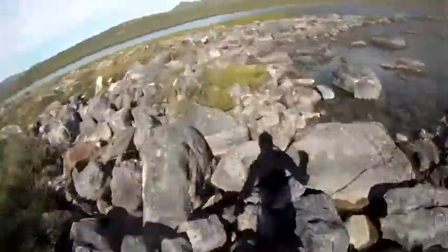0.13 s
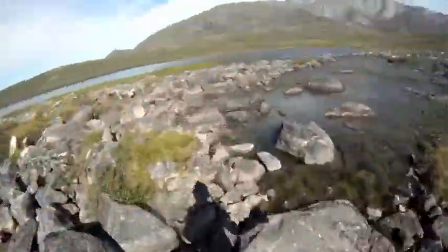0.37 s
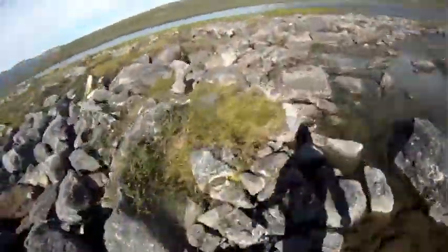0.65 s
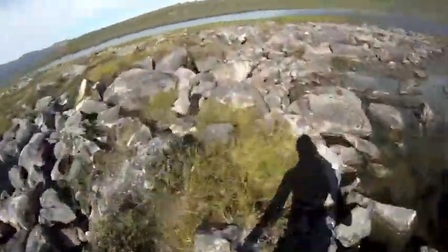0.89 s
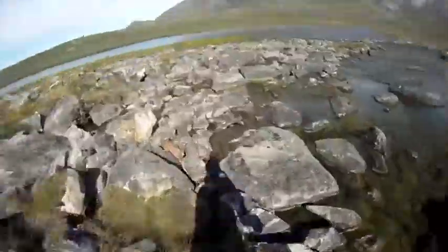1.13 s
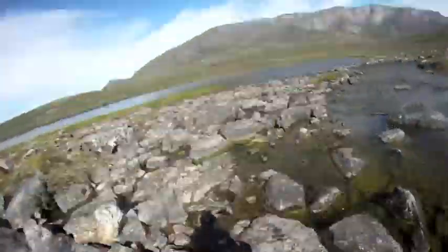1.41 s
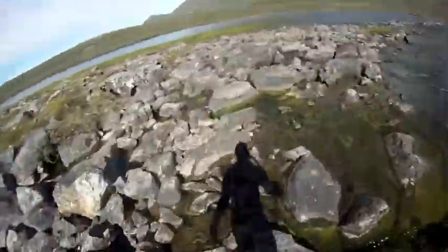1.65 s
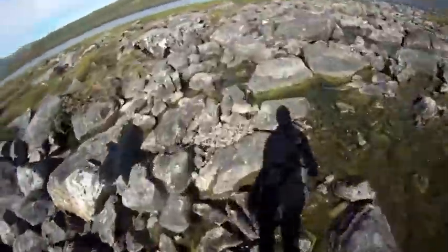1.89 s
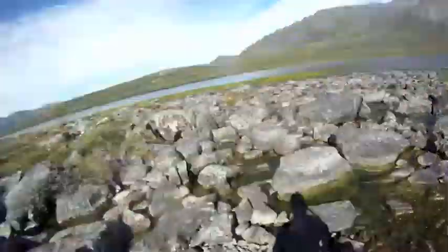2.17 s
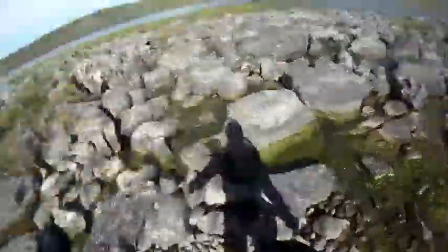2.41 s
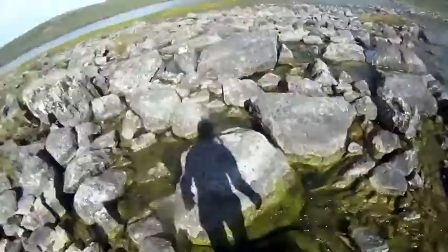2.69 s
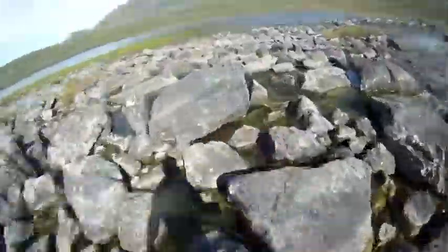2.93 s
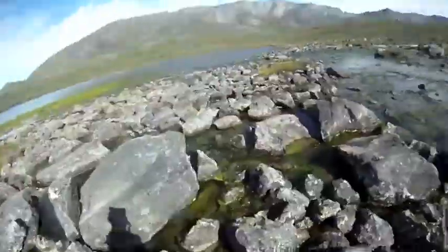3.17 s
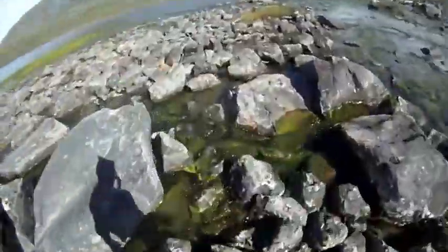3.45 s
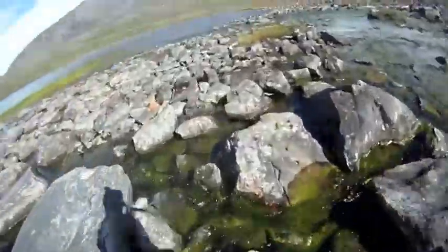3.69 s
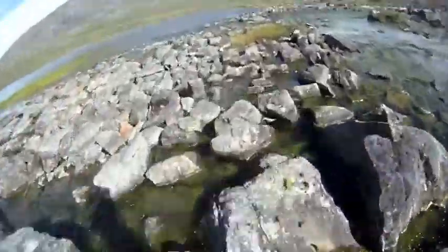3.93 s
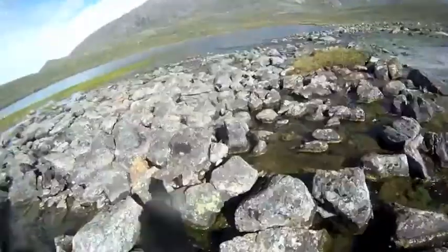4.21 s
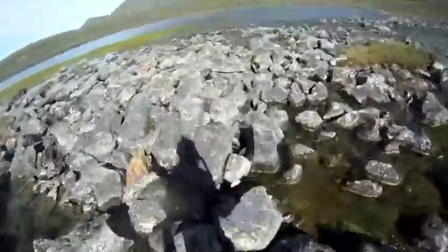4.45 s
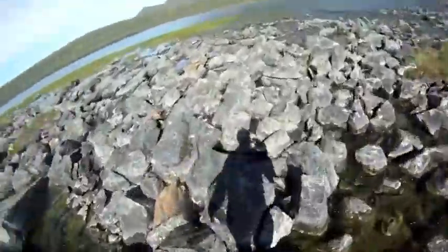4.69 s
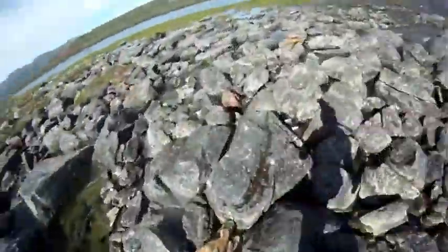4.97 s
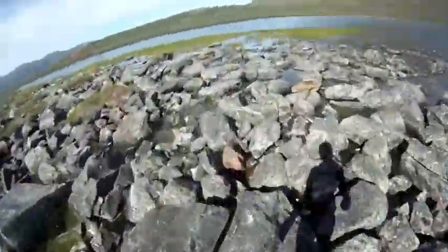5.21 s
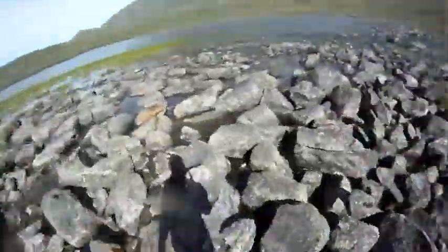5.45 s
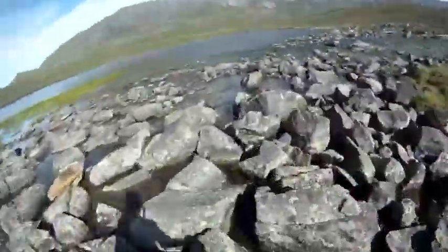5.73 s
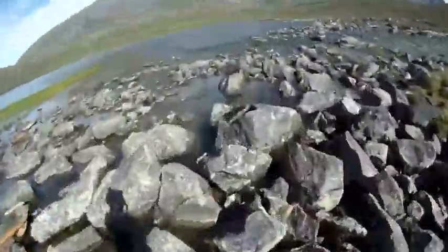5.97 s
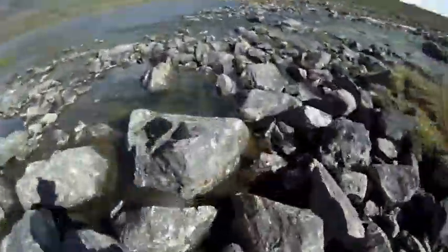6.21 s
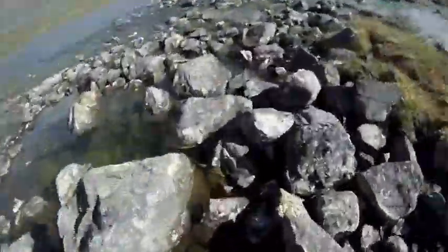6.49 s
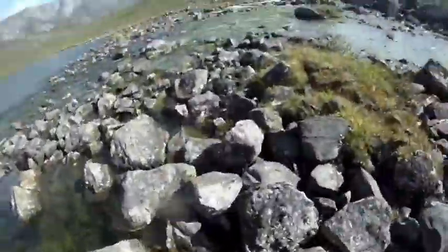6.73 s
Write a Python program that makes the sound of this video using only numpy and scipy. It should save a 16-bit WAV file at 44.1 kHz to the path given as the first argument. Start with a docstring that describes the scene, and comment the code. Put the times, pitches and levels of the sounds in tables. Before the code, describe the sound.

For nearly seven seconds a walker clambers over rocks, heard from inside a plastic camera housing fixed to the body. Everything is close, dry and muffled. A firm double thump opens at 0.1 s with small plastic ticks, then knocks follow at 0.4, 0.6, 1.0, 1.15, 1.3 and 1.4 s, with a strong, hard-edged one at 1.55 s. A cluster of lighter rattles and clicks comes around 2.2 s, then solid thuds at 2.5 and 2.8 s. A very short, bright click snaps at 3.06 s, followed by a thump at 3.25 s. Weaker bumps lead to a pair at 4.15 and 4.3 s and another at 4.6 s. Quieter shuffling follows until heavy knocks at 5.66 and 6.17 s; the end is calmer. Low shaking, slight creaks, faint cloth scuffs, tiny crackles and thin airy hiss continue underneath, the air rising slightly.

```python
"""Jolts make a mount ring briefly, mostly near 160 Hz, as a walker clambers over boulders with a
camera in a plastic housing; each is a swelling, dying sine, a second mode and a sharp edge.
Coloured noise shakes and creaks the mount between jolts. Ticks, scuffs and settling seams are short
noise bursts exciting the housing's modes; faint open air is noise through the port's resonances."""
import sys
import numpy as np
from scipy import signal
from scipy.fft import rfft, irfft, next_fast_len
from scipy.io import wavfile
from scipy.ndimage import map_coordinates

SR = 44100
rng = np.random.default_rng(int(sys.argv[2]) if len(sys.argv) > 2 else 0)


def int16_out(signal):
    """Quantize to a 16-bit WAV file."""
    q = np.round(np.clip(np.atleast_2d(signal).T, -1, 1) * 32767)
    wavfile.write(sys.argv[1], SR, q.astype(np.int16))


def linear_from_db(decibels):
    """Turn decibels (scalar or array-like) into linear amplitude factors; 0 gives 1."""
    return 10 ** (np.asarray(decibels, float) / 20)


N = 302557

# Jolts to the mount. Each row: start in seconds, ring level in dB, ring frequency in Hz,
# 60 dB decay time of the ring in ms, drive of the sharp edge in dB relative to the ring.
JOLT_ROWS = [(0.1146, -22, 138, 21, -8), (0.1222, -11, 142.5, 40, -7), (0.1753, -43, 156, 83, -13),
             (0.295, -35.5, 149, 75, -1), (0.431, -20, 161, 23, -23), (0.4426, -32.5, 198, 44, -21),
             (0.5672, -34, 155, 30, -10), (0.5787, -12, 143.5, 38, 5), (0.612, -37, 107, 80, 7),
             (0.693, -26.5, 164.6, 79, -7), (0.8304, -44.5, 132, 390, -1), (0.9847, -14.5, 171.2, 34, -6.5),
             (1.1592, -13, 141.4, 28, -23), (1.3103, -20, 153.6, 25.4, -12), (1.4163, -14, 156.6, 46, -16),
             (1.564, -9.5, 150, 24.3, 1.5), (1.7142, -32, 180, 50, -9), (1.7297, -25, 157, 32, -24),
             (1.808, -39, 173, 84, -19), (1.8344, -24.5, 156, 28, -12), (1.974, -44, 188, 60, 14.5),
             (2.1822, -29.5, 149, 50, -6), (2.1981, -41, 169, 30, 8), (2.2076, -25.5, 174, 17, 16.5),
             (2.2212, -25, 117, 83, -11), (2.238, -40, 150, 55, 15), (2.276, -33, 108, 60, -4),
             (2.3326, -54, 169, 52, -12), (2.4722, -11.5, 167.8, 28, 6), (2.7973, -15.5, 134.6, 28, -21),
             (2.8, -32, 283, 18, -14), (2.9476, -37, 163, 45, 2), (2.964, -31.5, 144.5, 19, -11),
             (2.986, -39, 154, 83, -5), (3.0926, -24, 204, 86, -6), (3.2556, -15, 162.7, 45, -21),
             (3.3958, -29, 150, 30, -30), (3.43, -40, 157, 70, -14), (3.5348, -40, 200, 21, 0),
             (3.546, -38.5, 172, 39, 1), (3.6832, -27.5, 159, 27, -28), (3.734, -37.5, 149, 26, -12),
             (3.844, -28.5, 151.5, 28, -8), (4.0082, -22.5, 156, 25, -25), (4.0228, -34.5, 134, 83, -5),
             (4.0391, -32.5, 150, 23, -7), (4.0569, -39, 172, 140, -4), (4.147, -13, 153.3, 33, -27),
             (4.274, -13, 175, 37, -30), (4.4492, -28, 180, 22, -27), (4.497, -44.5, 141, 50, -9),
             (4.5648, -30.5, 159, 48, -1), (4.5942, -16.5, 167, 70, -9), (4.672, -50.5, 253, 37, 20),
             (4.8039, -34, 173, 78, -9), (4.9752, -23.5, 155.5, 35, -18), (5.1713, -50, 234, 140, 6),
             (5.186, -37.5, 158.4, 130, 7.5), (5.3096, -41.5, 197, 115, -7), (5.3542, -28, 163, 46, -6),
             (5.5014, -34, 156, 99, -12), (5.652, -48, 168, 27, 8), (5.6609, -10, 160.3, 27, -1.5),
             (5.799, -37.5, 202, 28, -6), (5.9807, -38, 135, 23, -3), (6.0043, -23.5, 152, 18.6, -6),
             (6.163, -30, 164, 34, -5), (6.171, -12.5, 155.4, 26.5, -18), (6.4028, -42.5, 130, 41, 7),
             (6.538, -43, 174, 150, -18), (6.7063, -39.5, 170, 69, -15)]
# Ticks of the housing. Each row: start in seconds, drive of the middle modes in dB, of the low modes
# in dB relative to the middle, of the top modes in dB relative to the middle, 1/e decay time in ms.
TICK_ROWS = [(0.1154, -54.5, 11, -14, 1.3), (0.1269, -31, -16.5, -28, 1.2),
             (0.1308, -35.5, -0.5, -27, 0.69), (0.582, -40.5, -0.5, 6, 2.7), (0.5881, -36, 2, -21, 0.69),
             (0.5945, -52, 10, -18, 0.83), (0.621, -41.5, -2, -22, 0.75), (0.699, -44, -4, -19, 1.5),
             (0.866, -46, -17, -1, 0.6), (0.9914, -54, 8, -12, 2.1), (0.993, -49.5, 2, -15, 0.57),
             (1.1676, -39, -4, -26, 0.54), (1.1831, -46, -4, -11, 0.7), (1.313, -48, -0.5, -5, 1.5),
             (1.5693, -37.5, 1.5, -5, 1.17), (1.5734, -35, 0, -20, 0.49), (2.186, -42, -6, -4, 1.3),
             (2.1995, -35.5, 5, -17, 0.78), (2.2029, -42, -6, -10, 2.4), (2.225, -49.5, 0, -18, 1.24),
             (2.2383, -36.5, -9, 2, 0.69), (2.2508, -45, 8, -19, 0.8), (2.2678, -49, 4.5, -11, 1.7),
             (2.4766, -44, 5, -1, 2.3), (2.4855, -49, -17, -6, 1.3), (2.5113, -42, -1, -22, 0.67),
             (2.7998, -59, 11, -12, 2.9), (2.8079, -31.5, -7, -24, 0.43), (3.0622, -6.5, -40, 2, 0.11),
             (3.68, -59, -5, -5, 1.2), (3.9176, -36.5, -11, -11, 0.53), (4.1432, -41, -2, -18, 1.1),
             (4.15, -37.5, 11, -15, 0.4), (4.156, -36.5, -8, -24, 0.53), (4.3205, -30, -16, -13, 0.36),
             (4.448, -52, 10.5, -14, 0.66), (5.657, -54, 6, -15, 0.7), (5.6652, -41.5, 11.5, -6, 0.65),
             (5.6689, -35, 1.5, -11, 0.49), (5.6771, -39, 5.5, -16, 0.77), (5.696, -48, -5, -25, 0.65),
             (5.978, -52, -2, -22, 1.1), (6.1796, -36, -1.5, -27, 0.34), (6.348, -42, -3, -14, 0.55),
             (6.6578, -48, -1, -1, 1.2)]
# Cloth and strap scuffs. Each row: centre in seconds, drive in dB, drive of the low modes in dB
# relative to it, width at half amplitude in ms (before the grit).
SCUFF_ROWS = [(0.102, -62.5, 1.5, 25.5), (0.147, -64.5, -1, 24), (0.227, -72, -1, 26), (0.306, -70, 4, 14),
              (0.365, -71, 4, 14), (0.604, -70, 4, 69), (0.617, -61.5, -2, 18), (0.671, -70.5, 5.5, 21),
              (0.883, -74, -8, 35), (0.921, -68.5, 1, 14), (0.99, -77, 4, 47), (1.178, -68.5, 5.5, 43),
              (1.575, -64, -9, 20), (1.74, -68, 7, 20), (1.779, -69, 3, 24), (1.825, -70.5, 4, 31),
              (1.871, -70, 4.5, 19), (2.211, -63, -2, 12), (2.236, -63.5, 0.5, 64), (2.271, -56.5, 11.5, 6),
              (2.321, -70.5, 2.5, 36), (2.49, -64, -1, 43), (2.606, -73, -4, 29), (2.698, -68.5, -5, 28),
              (2.812, -71, -10, 21), (2.99, -63, 3.5, 14.6), (3.019, -73, 5, 19), (3.207, -68.5, 5, 15.5),
              (4.034, -74, 7, 25), (4.15, -75, 8, 38), (4.517, -71, 6, 21.5), (4.56, -70, 5, 42),
              (4.918, -71, 3, 19), (4.979, -64, 0, 12.4), (5.016, -67.5, 3.5, 18.5), (5.384, -63, -1, 24),
              (5.411, -67, 10, 5.8), (5.223, -66, 2, 4), (5.67, -70, 6, 31), (5.703, -68, -5, 16),
              (5.981, -63.5, 5.5, 21.4), (6.015, -70, 5, 33), (6.101, -73, 2, 20), (6.18, -69, 9, 25),
              (6.405, -75, 8, 27), (6.774, -72, 8, 11.6)]
# Air through the shell. Each row: time in seconds, level before the gusts in dB.
AIR_LEVEL = [(0.0, -71.5), (0.4, -72.5), (2.0, -71), (3.5, -70.5), (4.5, -68.5), (5.5, -68.5),
             (6.86, -67.5)]
# Modes of the shell in three groups. Each row: centre in Hz, width in Hz, relative level in dB.
SHELL_LOW_MODES = [(780, 420, -2.5), (2430, 840, -5.5), (3330, 510, -2), (4730, 870, -3)]
SHELL_MIDDLE_MODES = [(7680, 3260, 0.5), (9250, 1530, 3.5), (10000, 460, 3)]
SHELL_TOP_MODES = [(11500, 4600, -0.84), (14900, 990, 1)]
# Resonances of the microphone port. Each row: centre in Hz, width in Hz, relative level in dB.
PORT_MODES = [(4700, 700, 0), (7750, 700, -6), (9150, 480, 0), (10200, 600, -7), (11900, 900, -13),
              (14600, 700, -11)]
# Modes of the mount's joint. Each row: centre in Hz, width in Hz, relative level in dB.
JOINT_MODES = [(275, 404, 6), (475, 450, -8)]
# The mount as the shaking excites it. Each row: frequency in Hz, relative density in dB per Hz.
MOUNT_SPECTRUM = [(18, -68), (30, -10.5), (86, -9.5), (146, 0.5), (171, 1.5), (201, -2.5), (323, -19),
                  (600, -57), (1500, -53), (6000, -68)]
# Microphone self-noise. Each row: frequency in Hz, relative density in dB per Hz.
SELF_NOISE_SPECTRUM = [(20, 7), (300, -0.5), (1000, -4.5), (2900, -10), (6500, -15), (11400, -18),
                       (14500, -21.5), (16600, -30)]
# How hard the walker works, as the steady shaking of the mount.
# Each row: time in seconds, level before the random swings in dB.
EFFORT_LEVEL = [(0.0, -51.5), (0.09, -52), (2.06, -56), (2.29, -55), (2.71, -53), (2.9, -55), (3.23, -57),
                (4.15, -54), (4.99, -58.5), (5.5, -52.5), (6.25, -57), (6.86, -53.5)]

SELF_NOISE_DB = -61.5
# upper limits: above the first, only the sharp part of the ticks and a faint hiss sound; above the second,
# nothing
SPARSE_ABOVE_HZ, WHOLE_TOP_HZ = 15850, 16800
UPPER_MODE_DB = -24  # mean level of the mount's second mode relative to the first
# a long soft push rises slowly and damps the ring; a short one leaves it ringing
RISE_MS, RISE_AT_T60_MS, RISE_LAW = 8.8, 33.3, -1.3
# shaking stirred up by a jolt: level for a 0 dB jolt, dB per dB of jolt, 1/e times before and after
STIR_DB, STIR_LAW, BRACE_S, SETTLE_S = -38, 0.32, 0.0085, 0.018
# joint creak: level relative to the steady shaking; level for a 0 dB sharp edge, dB per dB of edge
CREAK_DB, GRIND_DB, GRIND_LAW = -20.5, -47, 0.62
PORT_LOW_DB, PORT_LOW_GROWS = 0.13, 1.56  # lowest port mode over the rest, and its wider swing


def unit(x):
    """Normalisation: a signal divided by its rms has rms 1."""
    return x / np.sqrt(np.mean(x ** 2) + 1e-20)


def curves(rows):
    """Linear interpolation: one value per sample for each column after the time."""
    times, *columns = np.transpose(rows)
    return [np.interp(np.arange(N) / SR, times, column) for column in columns]


def wobble(rate):
    """Band-limited randomness: a smooth spline through `rate` random knots a second."""
    knots = rng.standard_normal(int(N * rate / SR) + 4)
    return map_coordinates(knots, [np.arange(N) * rate / SR])


def white():
    """White noise: independent samples of equal mean power at every frequency."""
    return rng.standard_normal(N)


def filtered(x, response):
    """Linear filtering: the spectrum of x is multiplied by a complex response."""
    m = next_fast_len(N + 8192)
    return irfft(rfft(x, m) * response(np.fft.rfftfreq(m, 1 / SR)), m)[:N]


def below_sparse_band(x):
    """Band limitation: components from SPARSE_ABOVE_HZ upwards are removed."""
    return filtered(x, lambda hz: hz < SPARSE_ABOVE_HZ)


def coloured(spectrum):
    """Spectral shaping: white noise weighted along a log-frequency axis, with rms 1."""
    points_hz, points_db = np.transpose(spectrum)

    def response(hz):
        return linear_from_db(np.interp(np.log(hz + 1), np.log(points_hz), points_db))
    return unit(filtered(white(), response))


def through(x, modes):
    """Modal superposition: resonators of alternating sign add; white noise keeps its rms."""
    def response(f):
        total = 0
        for k, (centre, width, db) in enumerate(modes):
            resonance = 1j * f * width / (centre * centre - f * f + 1j * f * width)
            total = total + (-1) ** k * linear_from_db(db) * resonance
        return total / np.sqrt(np.mean(np.abs(total) ** 2))
    return filtered(x, response)


def add(track, s, piece):
    """Superposition: a piece is summed into a track from time s."""
    start = max(round(s * SR), 0)
    track[start:start + len(piece)] += piece[:N - start]


def around(times, levels_db):
    """Exponential growth and decay: a level builds up to each time and dies after it."""
    out, t = np.zeros(N), np.arange(-(SR // 10), SR // 5) / SR
    shape = np.exp(np.where(t < 0, t / BRACE_S, -t / SETTLE_S))
    for s, db in zip(times, levels_db):
        add(out, s + t[0], linear_from_db(db) * shape)
    return out


def shaking():
    """Random vibration: noise excites the mount steadily and round each jolt, and its joint creaks."""
    s, db, hz, _, edge_db = np.transpose(JOLT_ROWS)
    effort, fits = linear_from_db(curves(EFFORT_LEVEL)[0]), 2.93 * wobble(26)
    stirred = around(s + 1 / hz, STIR_DB + STIR_LAW * db)
    level = effort * linear_from_db(1.5 * wobble(8.1)) + stirred
    shake = level * linear_from_db(fits) * coloured(MOUNT_SPECTRUM)
    # the joint works against itself, higher and grainier
    grind = linear_from_db(CREAK_DB) * effort + around(s + 1 / hz, GRIND_DB + GRIND_LAW * (db + edge_db))
    joint = unit(through(through(white(), JOINT_MODES), JOINT_MODES))
    creak = grind * linear_from_db(0.64 * fits + 5.4 * wobble(64)) * joint
    return below_sparse_band(shake + creak)


def air():
    """Aperture resonance: outside air leaks in as noise shaped by the port, swelling in gusts."""
    high_db, = curves(AIR_LEVEL)
    low_db = high_db.mean() + PORT_LOW_DB + PORT_LOW_GROWS * (high_db - high_db.mean())
    gust_db = 0.9 * wobble(8)
    low = linear_from_db(low_db + gust_db) * through(white(), PORT_MODES[:1])
    high = linear_from_db(high_db + gust_db) * through(white(), PORT_MODES[1:])
    return below_sparse_band(low + high)


def rubbed_shell(rub, low):
    """Selective excitation: rubbing favours the lowest middle mode; the low modes have their own drive."""
    cloth = through(through(rub, SHELL_MIDDLE_MODES), [(7800, 1560, 0)])
    return below_sparse_band(through(low, SHELL_LOW_MODES) + cloth)


def seams():
    """Stress release: seams settle in tiny decaying noise bursts at random times throughout."""
    rub, low = np.zeros((2, N))
    t = np.arange(SR // 40) / SR
    for when, size, tilt in rng.random((60, 3)):
        shape = linear_from_db(-63 + 5 * size) * np.exp(-t / 0.0008)
        add(rub, when * N / SR, shape * rng.standard_normal(len(t)))
        add(low, when * N / SR, linear_from_db(-6 + 10 * tilt) * shape * rng.standard_normal(len(t)))
    return rubbed_shell(rub, low)


def grit(size):
    """Stick-slip friction: fibres catch and slip, so the level jumps every 90 samples, about 2 ms."""
    return np.repeat(rng.standard_normal(size // 90 + 1), 90)[:size]


def scuffs():
    """Sliding friction: cloth and straps stroke the shell with gritty noise that swells and fades."""
    rub, low = np.zeros((2, N))
    for centre, db, low_db, ms in SCUFF_ROWS:
        stroke = linear_from_db(db) * np.hanning(round(2 * ms * SR / 1000))
        stroke = stroke * linear_from_db(3.45 * grit(len(stroke)))
        start = centre - len(stroke) / SR / 2
        add(rub, start, stroke * rng.standard_normal(len(stroke)))
        add(low, start, linear_from_db(low_db) * stroke * rng.standard_normal(len(stroke)))
    return rubbed_shell(rub, low)


def jolts():
    """Damped oscillation: the mount swells and dies in a few cycles, meeting a stop at its first trough."""
    out, t = np.zeros(N), np.arange(SR // 8) / SR
    for s, db, hz, t60_ms, edge_db in JOLT_ROWS:
        rise_ms = RISE_MS * (t60_ms / RISE_AT_T60_MS) ** RISE_LAW
        envelope = (1 - np.exp(-1000 * t / rise_ms)) ** 2 * linear_from_db(-60000 * t / t60_ms)
        ring = np.sin(2 * np.pi * hz * t) * envelope
        ring = ring / np.abs(ring).max()
        # the second mode, with a decay of its own
        pitch_spread, level_spread = rng.standard_normal(2)
        upper_hz = 1.8 * hz * (1 + 0.12 * pitch_spread)
        upper_db = UPPER_MODE_DB + 2 * level_spread
        swell = (1 - np.exp(-t / 0.003)) ** 2 * linear_from_db(-60 * t / 0.025)
        twist = linear_from_db(upper_db) * np.sin(2 * np.pi * upper_hz * t) * swell / swell.max()
        # the sharp edge at the first trough, and the slower swing around it
        u = (t - 3 / (4 * hz)) / 0.00045
        cusp = np.exp(-np.sqrt(u ** 2 + 0.79))
        cusp_from_zero = cusp - cusp[0] * (u < 0)
        lean = 0.3 * np.exp(-(u / 7) ** 2 / 2) * (1 - np.exp(-(t / 0.0048) ** 2))
        edge = linear_from_db(edge_db) * (cusp_from_zero - lean)
        add(out, s, linear_from_db(db) * (ring + twist - edge))
    # high-pass at 30 Hz: thins the deepest bass of the jolts
    return filtered(out, lambda hz: 1j * hz / (30 + 1j * hz))


def ticks():
    """Impact excitation: decaying bursts of even-sized micro contacts ring three groups of shell modes."""
    low, middle, top = np.zeros((3, N))
    t = np.arange(SR // 40) / SR
    for s, db, low_db, top_db, ms in TICK_ROWS:
        shape = linear_from_db(db) * (1 - np.exp(-t / 0.0001)) * np.exp(-1000 * t / ms)
        for_middle, for_low, for_top = np.sign(rng.standard_normal((3, len(t)))) * shape
        add(middle, s, for_middle)
        add(low, s, linear_from_db(low_db) * for_low)
        add(top, s, linear_from_db(top_db) * for_top)
    sharp = through(through(middle, SHELL_MIDDLE_MODES), [(9000, 4400, 0)])
    sharp = sharp + through(top, SHELL_TOP_MODES)
    # steep skirts: little spills below the group
    sharp = filtered(sharp, lambda hz: (1j * hz / (5000 + 1j * hz)) ** 2)
    return below_sparse_band(through(low, SHELL_LOW_MODES)) + sharp


def scene():
    """Superposition: mount and shell share one microphone."""
    mount = shaking() + jolts()
    shell = air() + seams() + scuffs() + ticks()
    return (mount + shell)[None]


def band_limit(x):
    """A steep low-pass at the top of the band."""
    return signal.sosfilt(signal.butter(12, 16860, fs=SR, output="sos"), x)


def record(dry):
    """Transduction: the microphone adds hiss and rolls off deep bass; an upper cutoff bounds the whole."""
    hiss = linear_from_db(SELF_NOISE_DB) * coloured(SELF_NOISE_SPECTRUM)
    # the hiss is 26 dB weaker above SPARSE_ABOVE_HZ
    hiss = filtered(hiss, lambda hz: np.where(hz < SPARSE_ABOVE_HZ, 1, linear_from_db(-26)))

    def response(hz):
        upper_cutoff = np.clip((WHOLE_TOP_HZ - hz) / 500, 0, 1)
        bass_rolloff = 1j * hz / (45 + 1j * hz)
        return upper_cutoff * bass_rolloff
    heard = filtered(dry[0] + hiss, response)
    return band_limit(heard[None])


dry = scene()
out = record(dry)
int16_out(out)
```